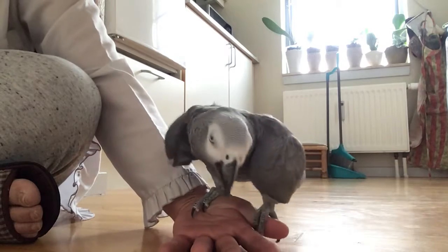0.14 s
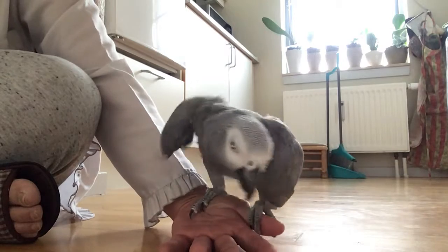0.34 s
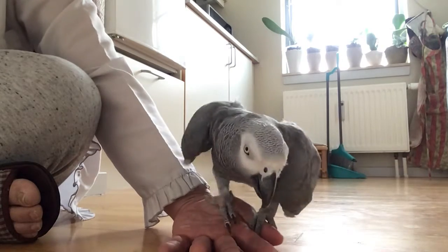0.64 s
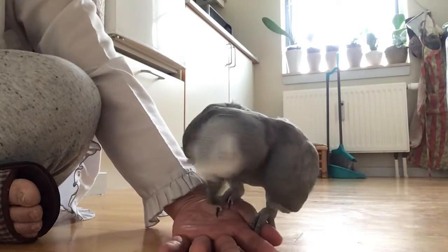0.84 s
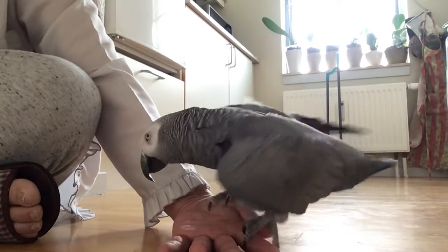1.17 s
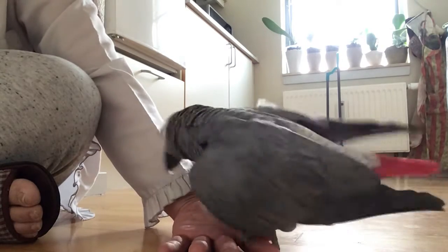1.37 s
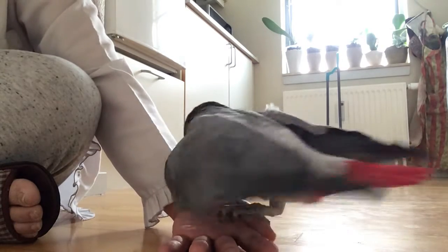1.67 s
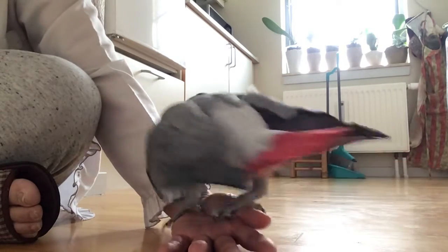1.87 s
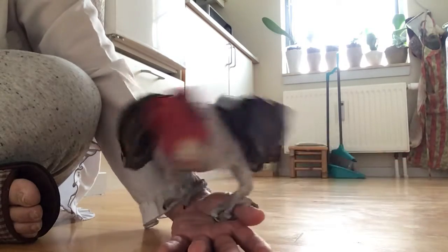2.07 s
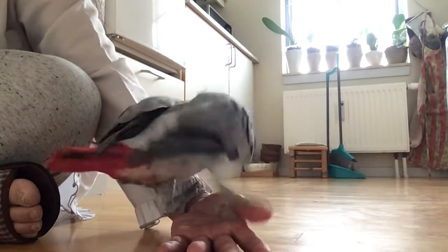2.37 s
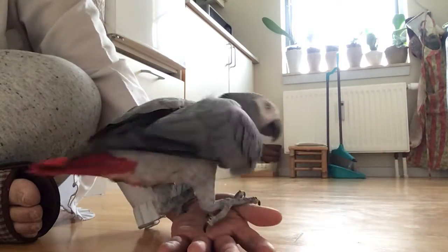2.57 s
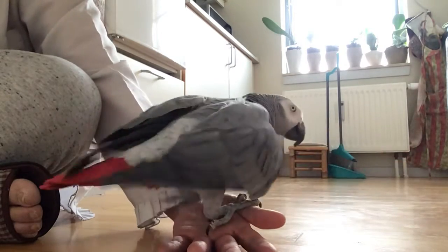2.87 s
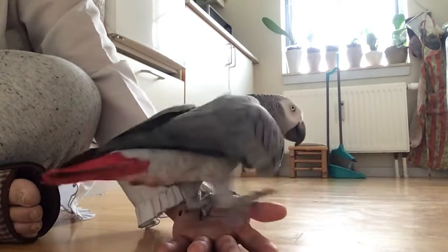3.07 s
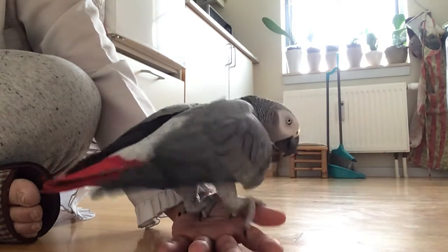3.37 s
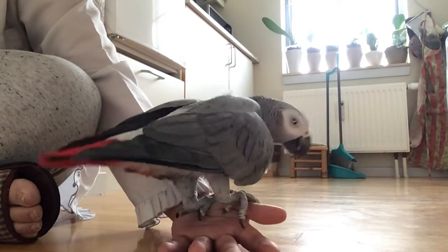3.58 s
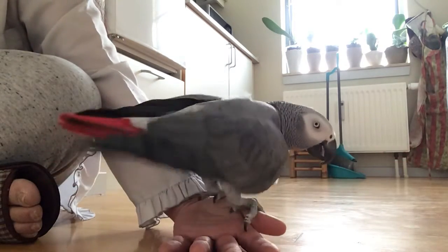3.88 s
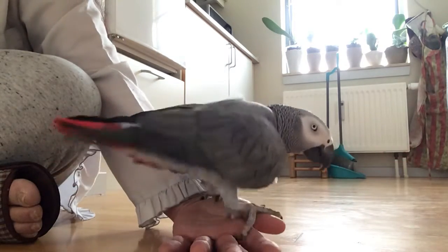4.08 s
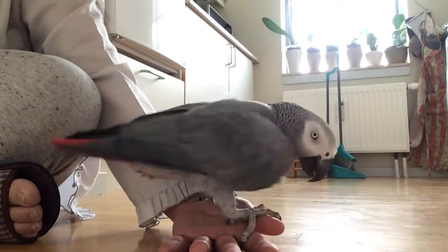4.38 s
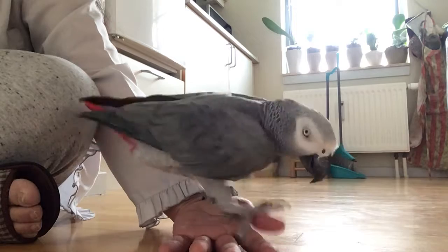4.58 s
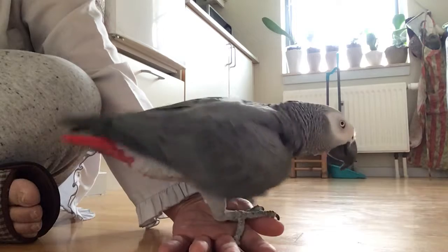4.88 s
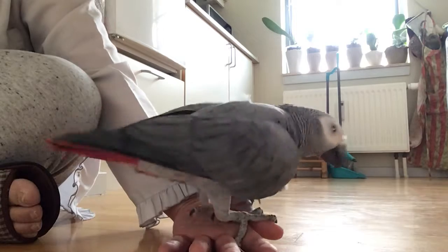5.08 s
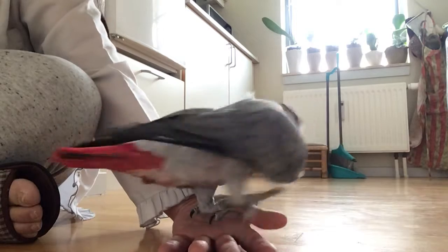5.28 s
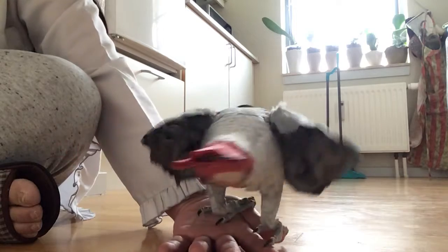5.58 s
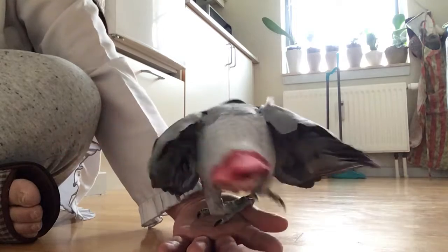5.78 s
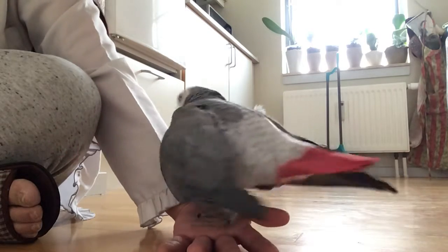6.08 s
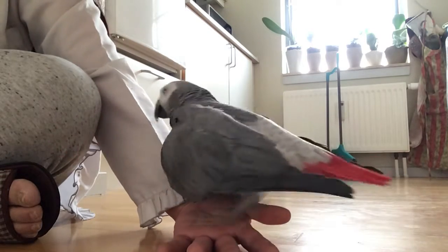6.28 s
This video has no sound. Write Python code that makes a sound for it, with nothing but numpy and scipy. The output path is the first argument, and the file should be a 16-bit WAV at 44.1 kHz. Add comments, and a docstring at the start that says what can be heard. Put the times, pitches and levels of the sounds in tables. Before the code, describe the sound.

Close indoor pickup of a grey parrot murmuring squeaks in an irregular stream. Bright, reedy tones of a few tenths of a second alternate with brief chirps and clicks; the middle ones are rougher and softer, the later ones clearer, with one rising very high near the end. Dull wing swishes and light plumage rustle accompany its turning. A hard-surfaced kitchen adds a short ring over quiet hum and faint hiss.

```python
"""Grey parrot chattering in a kitchen

A grey parrot shuffles about on a hand in a quiet kitchen and chatters softly to itself.
Each squeak is a gliding harmonic tone of the syrinx, shaped by throat and beak, plus an air hiss;
many open with a click and end in a steep downward swoop. Noise cracks ring as short ticks and tiny
high squeaks, feathers brush as shaped noise; a hard room rings a little over rumble, hiss and hum."""
import sys
import numpy as np
from scipy import signal
from scipy.fft import rfft, irfft, next_fast_len
from scipy.io import wavfile
from scipy.ndimage import uniform_filter1d

SR = 44100
rng = np.random.default_rng(int(sys.argv[2]) if len(sys.argv) > 2 else 0)


def wav_record(signal):
    """Record a signal, one row per channel, as 16-bit PCM in the file named by sys.argv[1]."""
    frames = np.transpose(np.atleast_2d(signal))
    bounded = np.clip(frames, -1, 1)
    # unit amplitude maps onto the largest positive 16-bit level
    quanta = np.round(bounded * 32767).astype(np.int16)
    wavfile.write(sys.argv[1], SR, quanta)


N = 284004
TIME = np.arange(N) / SR  # s


def undb(db):
    """Decibels to gain."""
    return 10 ** (np.asarray(db) / 20)


def unit(x):
    """Scale to rms 1."""
    return x / np.sqrt(np.mean(x ** 2))


def spectrum_db(points, hz):
    """Read (frequency [Hz], level [dB]) points on a log-frequency axis."""
    point_hz, point_db = np.transpose(points)
    return np.interp(np.log(np.maximum(hz, 1)), np.log(point_hz), point_db)


def colour(x, points):
    """Minimum-phase filter with the points' spectrum, scaled to keep the power of white noise."""
    size = 2 * next_fast_len(len(x))
    gain = unit(undb(spectrum_db(points, np.fft.rfftfreq(size, 1 / SR))))
    # fold the cepstrum to make the filter causal
    cepstrum = irfft(np.log(gain))
    cepstrum[1:size // 2] *= 2
    cepstrum[size // 2 + 1:] = 0
    response = np.exp(rfft(cepstrum))
    return irfft(rfft(x, size) * response)[:len(x)]


def noise():
    """White noise for the whole scene, rms 1."""
    return rng.standard_normal(N)


def wander(rate_hz):
    """Random drift, spread near 1: straight lines between rate_hz random values per second."""
    return np.interp(TIME * rate_hz, np.arange(N), noise())


def swells(rows):
    """Sum of bell-shaped gains from rows of (time [s], level [dB], length [s])."""
    return sum(undb(db) * np.exp(-.5 * ((TIME - s) / length_s) ** 2) for s, db, length_s in rows)


def crack(s, db, fade_s):
    """Noise burst: instant onset, exponential decay."""
    age_s = TIME - s
    decay = np.exp(-np.clip(age_s / fade_s, 0, 20))
    return (age_s > 0) * undb(db) * decay * noise()


# throat resonances: (frequency [Hz], level [dB])
THROAT_SPECTRUM = [(400, -10.5), (800, -6), (1400, -7), (2000, -1), (2700, -1), (3400, -6.5), (4200, -10.5),
                   (5500, -3.5), (6500, -5.5), (7400, -20.5), (9000, -10.5), (11000, -47)]
# air hiss: (frequency [Hz], level [dB])
AIR_SPECTRUM = [(400, -18), (1200, -28), (2600, 5), (4300, 3), (5500, 10), (6600, 8.5), (7700, 0.5),
                (9300, 11.5), (11000, -3), (13000, -25), (15500, -19)]
BEAK_FOLLOW = 0.83  # Hz rise of beak resonance per Hz of pitch


def syrinx(jitter=0.0346, shimmer_db=3.5, flutter_db=2.0, edge_s=0.0018, voice_db=-1, air_db=-1,
           knee_harmonic=2.1, fall_db_per_octave=5, rattle_rad=0.38, beak_db=7, beak_width_hz=400, seal=0.3):
    """Gliding harmonic squeaks; roughness shakes pitch, level and phase, and hiss pulses once a cycle."""
    wobble = jitter * (wander(900) + .5 * wander(110))
    shake_db, waver_db = shimmer_db * wander(450), wander(110)
    flutter = np.array([wander(70) for _ in range(10)])  # one row per harmonic
    grain = np.array([wander(700) for _ in flutter])
    k = np.arange(1, len(flutter) + 1)[:, None]
    voice, air = np.zeros(N), np.zeros(N)
    for points, rough, rest_hz in squeaks():
        s, *columns = np.transpose(points)
        i = np.flatnonzero((TIME > s[0] - edge_s) & (TIME < s[-1] + edge_s))
        tracks = [uniform_filter1d(np.interp(TIME[i], s, column), size=130) for column in columns]
        hz, level_db, slope_db, hiss_db = tracks
        gate = np.clip(np.minimum(i - i[0], i[-1] - i) / SR / edge_s, 0, 1)
        phase = 2 * np.pi * np.cumsum(hz * (1 + rough * wobble[i])) / SR

        # overtones fall faster above the knee
        source_db = slope_db * np.log2(k)
        source_db = source_db - fall_db_per_octave * np.maximum(np.log2(k / knee_harmonic), 0)
        # overtones swell as they cross a throat or beak resonance
        beak_hz = rest_hz + BEAK_FOLLOW * hz
        tract_db = spectrum_db(THROAT_SPECTRUM, k * hz)
        tract_db = tract_db + beak_db / (1 + ((k * hz - beak_hz) / beak_width_hz) ** 2)
        unsteady_db = flutter_db * (1.5 + 2.0 * rough) * flutter[:, i]
        partials = undb(source_db + tract_db + unsteady_db)
        partials *= np.clip((12500 - k * hz) / 2500, 0, 1)  # fade out 10-12.5 kHz
        partials /= np.sqrt(np.sum(partials ** 2, axis=0) / 2)

        # uneven cycles fray high overtones most
        fray_rad = rattle_rad * rough * k * grain[:, i]
        tone = np.sum(partials * np.sin(k * phase + fray_rad), axis=0)
        voice[i] += gate * undb(level_db + rough * shake_db[i] + waver_db[i]) * tone
        # a hard-pressed syrinx closes fully and leaks less air
        leak_db = hiss_db - seal * np.maximum(slope_db + 6, 0)
        air[i] += gate * undb(leak_db) * (1 + 0.09 * np.cos(phase))
    return undb(voice_db) * voice + undb(air_db) * colour(air * noise(), AIR_SPECTRUM)


# swoops closing the squeak before them:
# (end time [s], fall time [s], landing pitch [Hz], tone level [dB], hiss level [dB])
CLOSING_SWOOPS = [(.803, .008, 560, -33.5, -53.5), (1.269, 0.0079, 385, -39, -54.5),
                  (1.751, 0.0096, 374, -46.5, -64), (2.212, 0.037, 383, -51.5, -63.5),
                  (2.638, 0.01, 367, -45.5, -57), (3.058, .016, 337, -43, -62),
                  (3.586, 0.0062, 396, -47, -54), (3.987, 0.0074, 555, -39.5, -57),
                  (4.467, 0.0065, 422, -42.5, -52), (4.978, .006, 560, -50.5, -60),
                  (5.368, 0.0076, 420, -46, -56.5), (6.012, 0.0061, 490, -42, -59)]
SWOOP_MAX_START_HZ, SWOOP_REACH_S = 930, .05
SWOOP_FADE_DB, SWOOP_START_HISS_DB = -8, 0.5  # relative to the table levels
SWOOP_SLOPE_DB_PER_OCTAVE, SLACK_SLOPE_DB_PER_OCTAVE = -11.5, -6.5


def squeaks():
    """Yield (time [s], pitch [Hz], level [dB], slope [dB/octave], hiss [dB]) points, roughness, beak Hz.

    A swoop ending within SWOOP_REACH_S after a squeak's last point is joined to it."""
    for points, rough, rest_hz in [*whines(), *yelps(), *pips(), *grunts()]:
        for end_s, fall_s, slack_hz, db, hiss_db in CLOSING_SWOOPS:
            if 0 < end_s - points[-1][0] < SWOOP_REACH_S:
                last_s, last_hz = points[-1][:2]
                fall_start_s = max(end_s - fall_s, last_s)
                fall_start_hz = min(SWOOP_MAX_START_HZ, last_hz)
                points = points + [
                    (fall_start_s, fall_start_hz, db, SWOOP_SLOPE_DB_PER_OCTAVE, hiss_db + SWOOP_START_HISS_DB),
                    (end_s, slack_hz, db + SWOOP_FADE_DB, SLACK_SLOPE_DB_PER_OCTAVE, hiss_db)]
        yield points, rough, rest_hz


# whines: (start time [s], start pitch [Hz], press time [s], soft slope [dB/octave],
# pressed slope [dB/octave], hiss re tone [dB], roughness [0-1], beak resonance at rest [Hz])
WHINE_SETTINGS = [ (0.0, 1223, .012, -7, 7, -16, 0.28, 1210), (.451, 1000, 0.57, -8, 2, -23.5, 0.094, 1350),
                  (1.033, 683, 1.09, -1.5, -3.5, -30, 0.6, 2020),
                  (1.474, 562, 1.532, -11, -0.5, -33, 0.6, 2100),
                  (1.928, 556.5, 2.12, -11.5, -11, -18, 0.81, 1090),
                  (2.424, 482, 2.44, -10.5, -2, -25, .6, 1160),
                  (2.85, 758, 2.89, -1.5, -1.5, -21, 0.635, 1950),
                  (3.288, 502, 3.33, -20, 1, -13.5, 0.5, 1350),
                  (3.812, 490, 3.88, -17, 0.5, -19.5, 0.37, 1400),
                  (4.351, 1292, 4.412, -12, -4.5, -19.5, 0.1, 1240),
                  (4.673, 682, 4.71, -14, -0.5, -19.5, 0.44, 1260),
                  (5.223, 912, 5.255, -20, -5.5, -28, 0.088, 1300),
                  (5.688, 1232, 5.73, -12, -8.5, -35, .2, 1390),
                  (6.252, 1408, 6.27, -4, -1.5, -47, 0.18, 1600), ]
# course of each whine after its scoop: lists of (time [s], pitch [Hz], level [dB])
WHINE_CONTOURS = [
    [(.013, 1166, -38), (.044, 1341, -44), (.068, 2320, -53), (.078, 2200, -61)],
    [(.469, 1493, -42.5), (.497, 1400, -40), (.513, 1544, -41.5), (.548, 1403, -42.5), (.579, 1362, -29.5),
     (.606, 1554, -44.5), (.626, 2080, -47)],
    [(1.042, 899, -52.5), (1.056, 1002, -52.5), (1.078, 961, -47), (1.115, 1850, -57.5),
     (1.152, 1540, -53.5), (1.19, 906, -45.5), (1.212, 898, -49.5)],
    [(1.495, 1025, -51.5), (1.52, 866.5, -57.5), (1.547, 1035, -41), (1.566, 887, -45), (1.583, 1090, -41),
     (1.612, 1308, -43.5), (1.63, 1972, -45), (1.665, 1800, -44), (1.705, 1401, -49), (1.721, 659, -42)],
    [(1.955, 924, -51.5), (1.982, 730, -57), (2.025, 806, -54.5), (2.095, 810, -51.5), (2.138, 721, -55.5),
     (2.17, 853, -51)],
    [(2.449, 1337, -46.5), (2.478, 1030, -52), (2.495, 974, -55), (2.521, 1193, -54)],
    [(2.857, 760.5, -47), (2.871, 830, -48.5), (2.892, 1029, -43.5), (2.914, 1886, -60),
     (2.931, 1520, -48.5), (2.955, 1532, -53), (3.005, 717, -51), (3.032, 747, -56.5)],
    [(3.31, 1037, -53), (3.338, 980, -44.5), (3.353, 1150, -46.5), (3.386, 1198, -50.5), (3.4, 1357, -43.5),
     (3.412, 1820, -64)],
    [(3.85, 1296, -48), (3.874, 1344, -41), (3.904, 1168, -40), (3.933, 1300, -43), (3.946, 1361, -31),
     (3.958, 1705, -51.5), (3.968, 1725, -40)],
    [(4.366, 1411, -36.5), (4.392, 1251, -44), (4.42, 1122, -44), (4.44, 1221, -40.5), (4.456, 1098, -35.5)],
    [(4.693, 1260, -47.5), (4.729, 988, -43.5), (4.743, 1153, -48), (4.766, 1080, -45.5),
     (4.795, 1383, -42.5), (4.812, 2044, -53.5)],
    [(5.234, 1027, -43.5), (5.258, 1010, -42.5), (5.268, 927, -45.5), (5.305, 1120, -42.5),
     (5.333, 1146, -45.5), (5.349, 1361, -37)],
    [(5.697, 1655, -45.5), (5.709, 1770, -40.5), (5.731, 1593, -44), (5.767, 1880, -53), (5.82, 2200, -63),
     (5.832, 2650, -49), (5.842, 2820, -46), (5.847, 2750, -53)],
    [(6.261, 1269, -41), (6.277, 1404, -46), (6.299, 1433, -57), (6.324, 1478, -54)],
]
SCOOP_DB, PRESS_S = -5.5, 0.012  # scoop start re first contour point; press duration


def whines():
    """Long tones scoop to their pitch and waver; pressing the syrinx changes the overtone slope part-way."""
    for settings, contour in zip(WHINE_SETTINGS, WHINE_CONTOURS):
        start_s, start_hz, press_s, soft_slope_db, pressed_slope_db, hiss_db, rough, rest_hz = settings
        scoop = (start_s, start_hz, contour[0][2] + SCOOP_DB)
        course_s, course_hz, course_db = np.transpose([scoop] + list(contour))
        s = np.linspace(start_s, contour[-1][0], 200)
        hz = np.interp(s, course_s, course_hz)
        db = np.interp(s, course_s, course_db)
        pressed = np.clip((s - press_s) / PRESS_S + .5, 0, 1)
        slope_db = soft_slope_db + (pressed_slope_db - soft_slope_db) * pressed
        yield list(zip(s, hz, db, slope_db, db + hiss_db)), rough, rest_hz


# yelps: (start time [s], end time [s], top pitch [Hz], end pitch [Hz], level [dB],
# overtone slope [dB/octave], hiss re tone [dB], beak resonance at rest [Hz])
YELP_SETTINGS = [ (0.732, 0.784, 1490, 1443, -39, -10.5, -16, 1250),
                 (1.224, 1.257, 1406, 1236, -42, -7.5, -23.5, 1420),
                 (2.526, 2.595, 1002, 500, -47, -3.5, -24, 1850),
                 (2.597, 2.62, 1342, 1309, -39, -15, -22.5, 1290),
                 (3.532, 3.573, 1556, 1439, -42, -11, -23, 1290),
                 (4.933, 4.964, 1500, 1369, -42, -12, -24, 1220),
                 (5.851, 5.877, 2520, 2474, -40, -9, -24.5, 400),
                 (5.932, 6, 1960, 1630, -39.5, -9, -32, 1220), ]
YELP_ATTACK_S, YELP_START_RATIO, YELP_START_DB = .012, .92, -9.5
YELP_SAG_DB, YELP_ROUGH = -0.5, .2


def yelps():
    """Short tones jump to their pitch, then sag."""
    for start_s, end_s, top_hz, end_hz, db, slope_db, hiss_db, rest_hz in YELP_SETTINGS:
        shape = [(start_s, YELP_START_RATIO * top_hz, db + YELP_START_DB),
                 (start_s + YELP_ATTACK_S, top_hz, db),
                 (end_s, end_hz, db + YELP_SAG_DB)]
        yield [(*point, slope_db, db + hiss_db) for point in shape], YELP_ROUGH, rest_hz


# pips: (start time [s], length [s], first pitch [Hz], last pitch [Hz], level [dB],
# overtone slope [dB/octave])
PIP_SETTINGS = [ (0.321, .018, 1376, 1290, -56.5, -15), (.354, 0.027, 1272, 1700, -37.5, -3),
                (0.381, 0.042, 1560, 1730, -51, -3), (3.454, 0.027, 1545, 2150, -46.5, -5),
                (5.616, 0.017, 1405, 1426, -43, -10.5), (5.923, .014, 1180, 1420, -45.5, -15),
                (6.224, 0.022, 1290, 1280, -45.5, -24), (6.346, 0.025, 2110, 2530, -46.5, -4),
                (6.41, 0.034, 990, 1730, -49.5, -17.5), ]
PIP_ATTACK_S, PIP_EDGE_DB, PIP_HISS_DB, PIP_ROUGH = 0.0053, -16, -26, 0.12
BEAK_REST_HZ = 1445  # pips and grunts


def pips():
    """One straight glide that peaks early and fades."""
    for start_s, length_s, first_hz, last_hz, db, slope_db in PIP_SETTINGS:
        shape = [(0, db + PIP_EDGE_DB), (PIP_ATTACK_S, db), (length_s, db + PIP_EDGE_DB)]
        points = []
        for age_s, point_db in shape:
            hz = first_hz + (last_hz - first_hz) * age_s / length_s
            points.append((start_s + age_s, hz, point_db, slope_db, point_db + PIP_HISS_DB))
        yield points, PIP_ROUGH, BEAK_REST_HZ


# grunts: (start time [s], length [s], pitch [Hz], level [dB])
GRUNT_SETTINGS = [(0.086, 0.011, 766, -32), (.439, .013, 823, -41), (.716, 0.0144, 763, -40),
                  (3.282, .016, 526, -45), (3.52, .016, 630, -44.5), (4.331, 0.025, 674, -44.5),
                  (4.665, 0.0088, 616, -46), (4.92, 0.017, 565.5, -47.5), (5.194, 0.022, 525, -44),
                  (5.677, 0.012, 895, -47.5)]
GRUNT_ATTACK_S, GRUNT_START_RATIO, GRUNT_END_RATIO, GRUNT_EDGE_DB = 0.00395, 1.3, .88, -15.5
GRUNT_SLOPE_DB_PER_OCTAVE, GRUNT_HISS_DB, GRUNT_ROUGH = -11.5, -24, 0.36


def grunts():
    """Slack membranes start to move: a few low cycles, dropping in pitch."""
    for start_s, length_s, hz, db in GRUNT_SETTINGS:
        shape = [(start_s, GRUNT_START_RATIO * hz, db + GRUNT_EDGE_DB),
                 (start_s + GRUNT_ATTACK_S, hz, db),
                 (start_s + length_s, GRUNT_END_RATIO * hz, db + GRUNT_EDGE_DB)]
        points = [(*point, GRUNT_SLOPE_DB_PER_OCTAVE, db + GRUNT_HISS_DB) for point in shape]
        yield points, GRUNT_ROUGH, BEAK_REST_HZ


def puffs(puff_db=5, lead_s=0.004, fade_s=0.013):
    """As a swoop ends and the membranes go slack, pent-up air spits out as decaying hiss."""
    flow = np.zeros(N)
    for end_s, *_, hiss_db in CLOSING_SWOOPS:
        age_s = TIME - end_s + lead_s
        flow += (age_s > 0) * undb(hiss_db + puff_db) * np.exp(-np.abs(age_s) / fade_s)
    return colour(flow * noise() * undb(2.5 * wander(700)), AIR_SPECTRUM)


# throat clicks: (time [s], level before gain_db [dB])
THROAT_POPS = [(0.0835, -41.5), (0.4365, -36), (0.7145, -33), (1.476, -43.5), (2.818, -49.5),
               (3.177, -44.5), (3.2795, -47), (3.5225, -37.5), (4.3279, -35), (4.917, -40), (5.1868, -47)]
# click spectrum: (frequency [Hz], level [dB])
POP_SPECTRUM = [(300, -10), (900, -1), (1900, 4.5), (2900, 0), (4000, -37), (9000, -13), (14000, -55)]


def pops(fade_s=0.0053, gain_db=-7):
    """The throat snaps open: short coloured noise bursts."""
    return colour(sum(crack(s, db + gain_db, fade_s) for s, db in THROAT_POPS), POP_SPECTRUM)


# short ringing ticks and tiny high squeaks: (time [s], level before gain_db [dB], ring [Hz], fade [s])
RINGING_TICKS = [(0.925, -48.5, 3500, 0.0032), (1.057, -35, 3500, 0.0012), (1.114, -47, 3820, 0.0071),
                 (1.119, -44.5, 4100, 0.0067), (1.142, -41.5, 3700, 0.0024), (1.487, -34.5, 3200, 0.0036),
                 (1.537, -60, 4340, 0.0021), (1.602, -54, 3600, 0.0015), (2.122, -51, 4130, 0.003),
                 (3.177, -57, 1900, .003), (3.201, -82, 4070, 0.0017), (3.234, -46, 2380, 0.0024),
                 (4.183, -39, 1800, 0.0034), (4.211, -46, 4500, 0.0021)]
# tick spectrum: (frequency [Hz], level [dB])
TICK_SPECTRUM = [(400, 7), (1500, -12.5), (3200, -2), (5500, -5), (7500, -14.5), (9500, -18), (14000, -38)]


def ticks(ring_q=7.8, ring_db=9, gain_db=-8):
    """A noise crack excites a brief resonance."""
    out = np.zeros(N)
    for s, db, hz, fade_s in RINGING_TICKS:
        push = crack(s, db + gain_db, fade_s)
        ring = signal.lfilter(*signal.iirpeak(hz, ring_q, fs=SR), push)
        out += push + undb(ring_db) * ring
    return colour(out, TICK_SPECTRUM)


# very high ticks: (time [s], level before gain_db [dB])
TREBLE_TICKS = [(.454, -60), (4.096, -63), (4.345, -51), (4.666, -57)]
# very high tick spectrum: (frequency [Hz], level [dB])
TREBLE_TICK_SPECTRUM = [(6000, -35), (10000, -8), (12500, 0), (15000, -9)]


def high_ticks(fade_s=0.0017, gain_db=-6):
    """Thin pinpricks of treble noise."""
    return colour(sum(crack(s, db + gain_db, fade_s) for s, db in TREBLE_TICKS), TREBLE_TICK_SPECTRUM)


# feather brushes as the bird turns: (time [s], level before gain_db [dB], length [s])
FEATHER_BRUSHES = [(1.8, -63, 0.07), (2.19, -59.5, 0.049), (3.17, -63, 0.24), (4.2, -61.5, 0.036),
                   (5.66, -68.5, 0.28), (6.03, -69.5, 0.13), (6.44, -61, 0.08)]
# brush spectrum: (frequency [Hz], level [dB])
BRUSH_SPECTRUM = [(150, 2), (400, 10), (900, 2.5), (2500, 3.5), (4000, 3), (6000, -1), (9500, -9),
                  (14000, -23.5)]
STEADY_RUSTLE_DB = -73  # before gain_db


def feathers(grain_db=2.5, patchy_db=2.0, gain_db=-3, snaps_per_s=45, snap_db=-6, snap_s=0.0036):
    """Slipping barbs make uneven noise; quills or claws snap free as random decaying bursts."""
    grains = unit(noise() * undb(grain_db * wander(700) + patchy_db * wander(40)))
    catches = (rng.random(N) < snaps_per_s / SR) * rng.random(N) ** 2
    snap_envelope = signal.lfilter([1], [1, -np.exp(-1 / (snap_s * SR))], catches)
    snaps = unit(snap_envelope * noise())
    rustle = colour(grains + undb(snap_db) * snaps, BRUSH_SPECTRUM)
    return rustle * undb(gain_db) * np.hypot(undb(STEADY_RUSTLE_DB), swells(FEATHER_BRUSHES))


# wing and foot swishes: (time [s], level [dB], length [s])
WING_SWISHES = [(1.26, -54, 0.017), (1.754, -65.5, 0.038), (2.196, -62.5, .03), (2.636, -53.5, 0.011),
                (3.061, -49, 0.0073), (3.582, -52, 0.0053), (5.573, -69, 0.15), (5.693, -64, 0.043),
                (5.874, -72, 0.17), (6.196, -54.5, 0.02)]
# swish spectrum: (frequency [Hz], level [dB])
SWISH_SPECTRUM = [(80, -1.5), (180, -19), (370, 5), (480, -12.5), (900, -19), (3000, -19), (9000, -46)]


def swishes():
    """Air pushed by wings and shifting feet: dull noise swells."""
    return colour(swells(WING_SWISHES) * noise(), SWISH_SPECTRUM)


# echo tail spectrum: (frequency [Hz], level [dB])
ECHO_SPECTRUM = [(200, -5.5), (800, -3), (1600, -5.5), (2800, 4), (5000, 5), (9000, 1), (14000, 0)]
# reflections off floor, hand and cupboards: (delay [s], level [dB])
FIRST_REFLECTIONS = [(.0013, -31), (.0034, -41), (.0067, -17), (.0112, -31), (.0178, -23.5), (0.025, -21)]
# beak turned away from the listener: (time [s], room share before scaling [dB])
TURN_AWAY = [(0, -0.5), (1.7, 2.5), (2.1, 5), (3.3, 4.5), (4.3, 0.5), (4.9, 4), (6.4, 5)]


def kitchen(x, t60_s=0.41, treble_t60_s=0.34, split_hz=4500, wet_db=-13, early_db=-15, early_s=0.038):
    """First reflections, scattered echoes and a short tail; turning away lifts them and dims direct sound."""
    t = TIME[:SR]
    low_pass = signal.butter(2, split_hz, fs=SR, output="sos")
    high_pass = signal.butter(2, split_hz, "high", fs=SR, output="sos")
    low = signal.sosfilt(low_pass, noise()[:SR]) * np.exp(-np.log(1000) * t / t60_s)
    high = signal.sosfilt(high_pass, noise()[:SR]) * np.exp(-np.log(1000) * t / treble_t60_s)
    tail = colour((low + high) * np.clip(t / 0.0013, 0, 1), ECHO_SPECTRUM)
    # chairs and clutter: fifth power makes sparse spikes
    early = noise()[:SR] ** 5 * np.exp(-t / early_s) * (t > .005)
    response = (undb(wet_db) * unit(tail) + undb(early_db) * unit(early)) / np.sqrt(SR)
    for delay_s, db in FIRST_REFLECTIONS:
        response[int(delay_s * SR)] += undb(db)
    away_db = np.interp(TIME, *np.transpose(TURN_AWAY))
    direct = x * undb(-.25 * away_db)
    return direct + signal.fftconvolve(x * undb(1.02 * away_db), response)[:N]


# room hum: (frequency [Hz], level [dB rms])
ROOM_HUM = [(120.6, -69.5), (178.7, -75.5), (214.7, -72)]
# still room spectrum: (frequency [Hz], level [dB])
ROOM_SPECTRUM = [(30, -22.5), (60, -4), (90, -7), (150, -2.5), (230, -3), (330, -15), (500, -23),
                 (750, -19), (1100, -31), (1800, -27.5), (2800, -33.5), (4400, -47), (11500, -40.5),
                 (15500, -53)]


def room_tone(level_db=-61.5):
    """Coloured-noise rumble and hiss plus phase-wavering hum sines."""
    hum = np.zeros(N)
    for hz, db in ROOM_HUM:
        hum += undb(db) * unit(np.sin(2 * np.pi * hz * TIME + 0.59 * wander(5.3)))
    return hum + unit(colour(noise(), ROOM_SPECTRUM)) * undb(level_db)


def scene():
    """The bird in its room, over the room tone."""
    bird = syrinx() + puffs() + pops() + ticks() + high_ticks() + feathers() + swishes()
    return (kitchen(bird) + room_tone())[None]


def record(dry, bass_hz=48, top_hz=15700):
    """High-pass thins deep bass; steep elliptic low-pass cuts the top."""
    thin = signal.sosfilt(signal.butter(4, bass_hz, "high", fs=SR, output="sos"), dry)
    return signal.sosfilt(signal.ellip(8, .2, 70, top_hz, fs=SR, output="sos"), thin)


dry = scene()
out = record(dry)
wav_record(out)
```